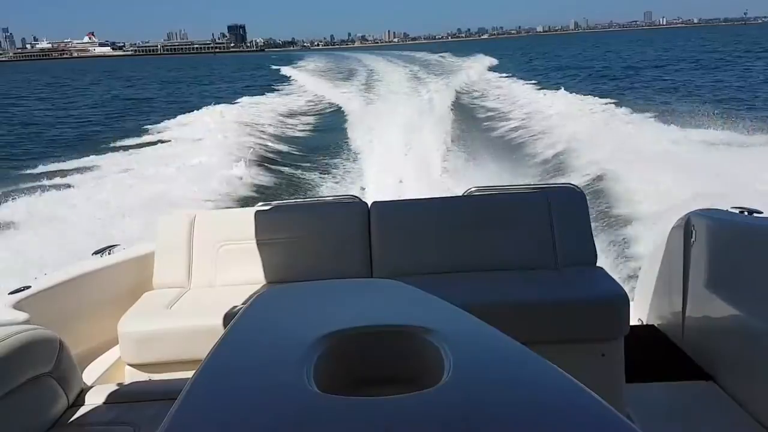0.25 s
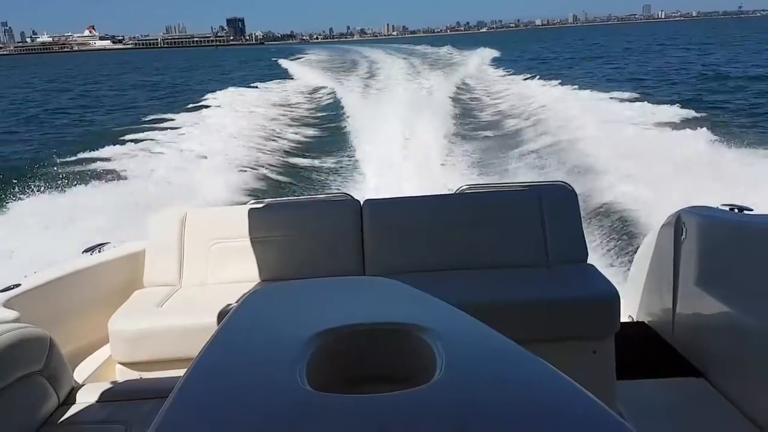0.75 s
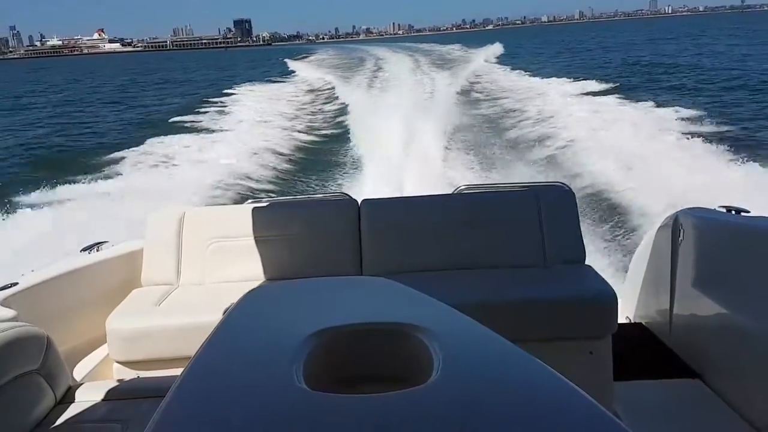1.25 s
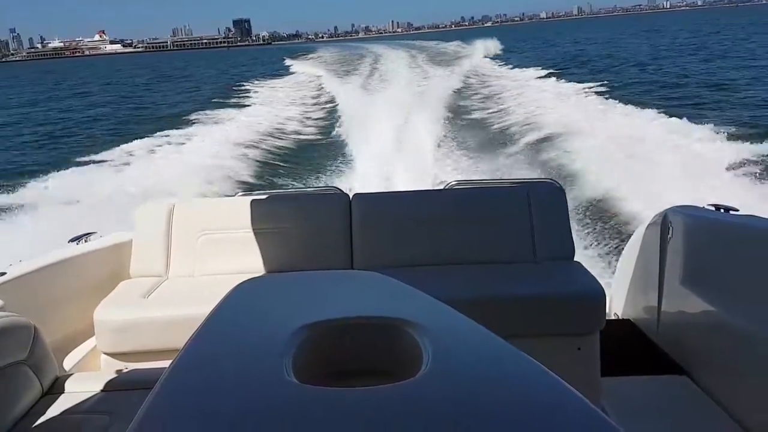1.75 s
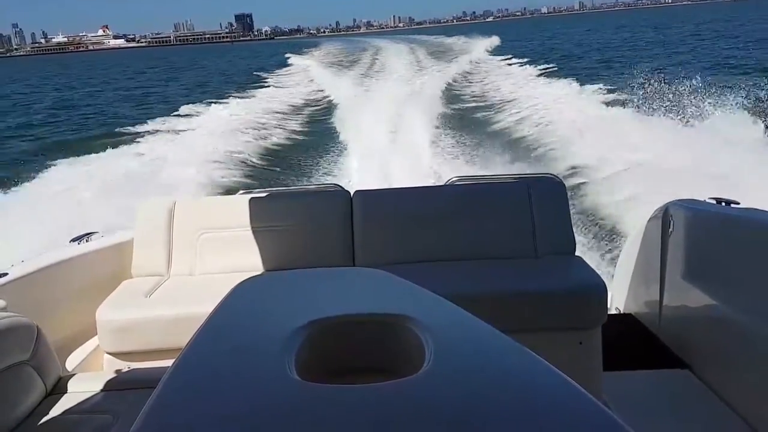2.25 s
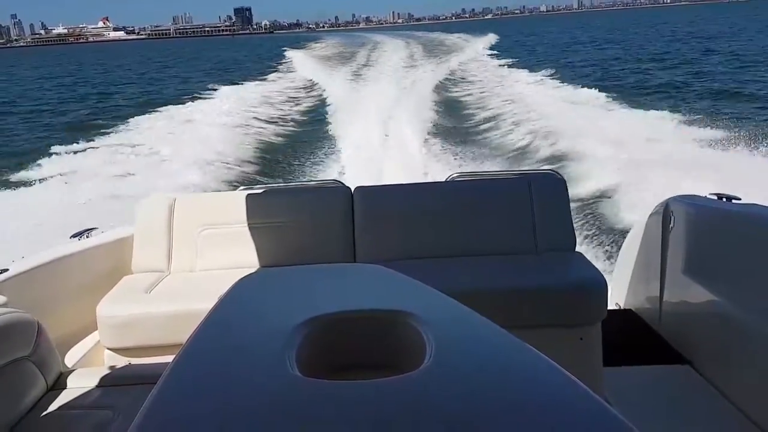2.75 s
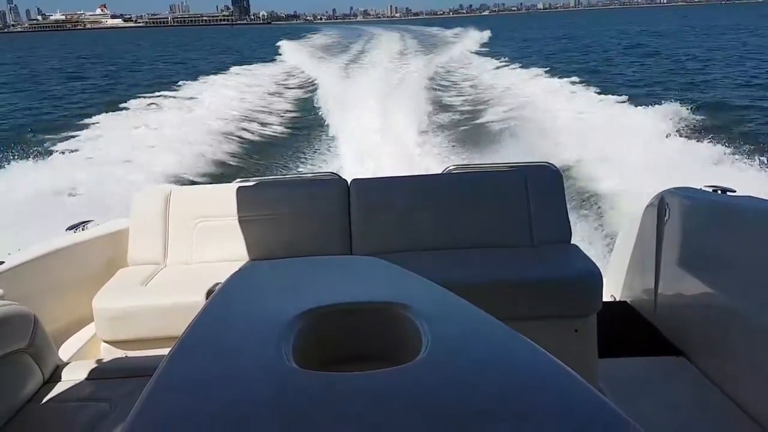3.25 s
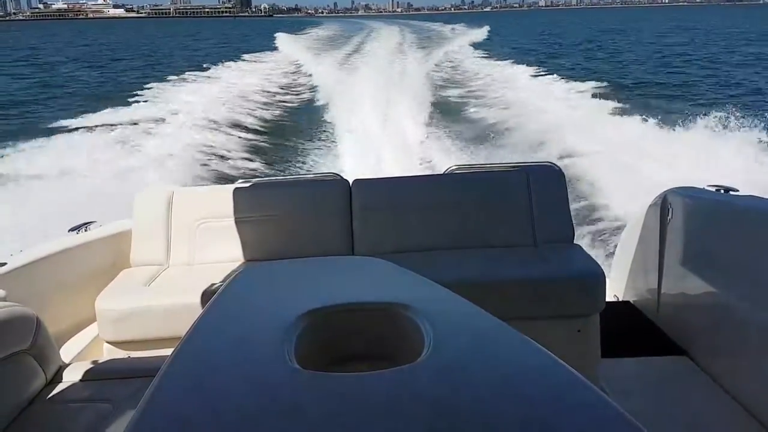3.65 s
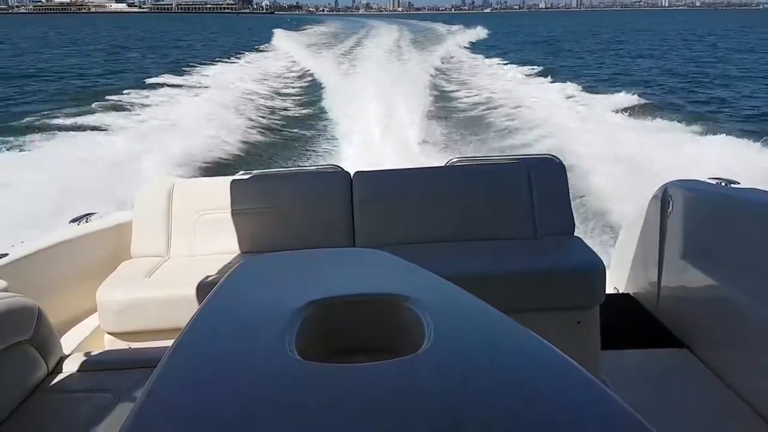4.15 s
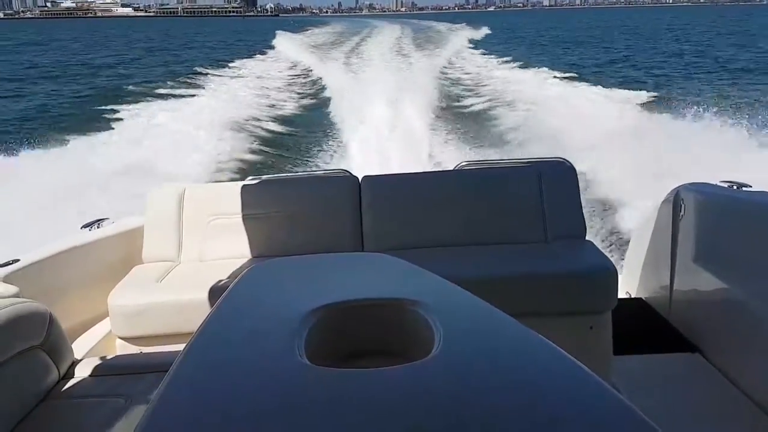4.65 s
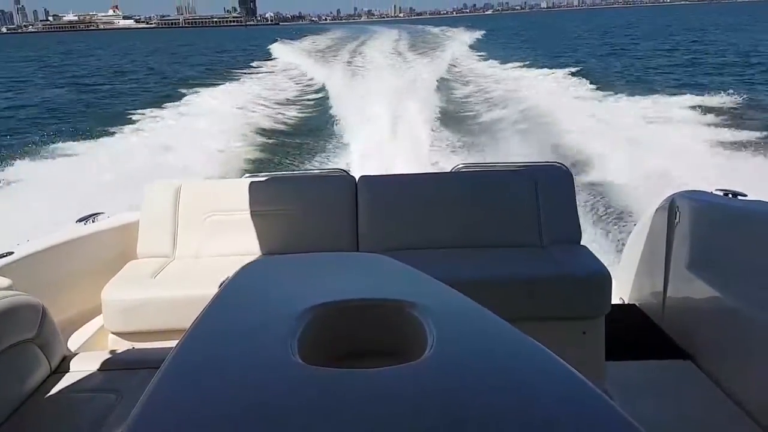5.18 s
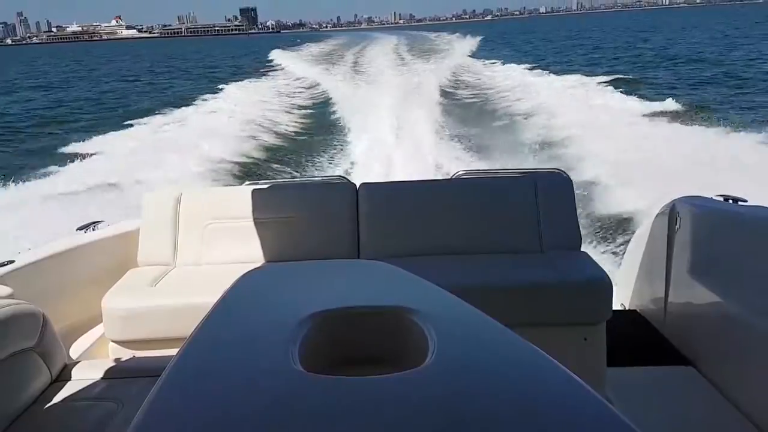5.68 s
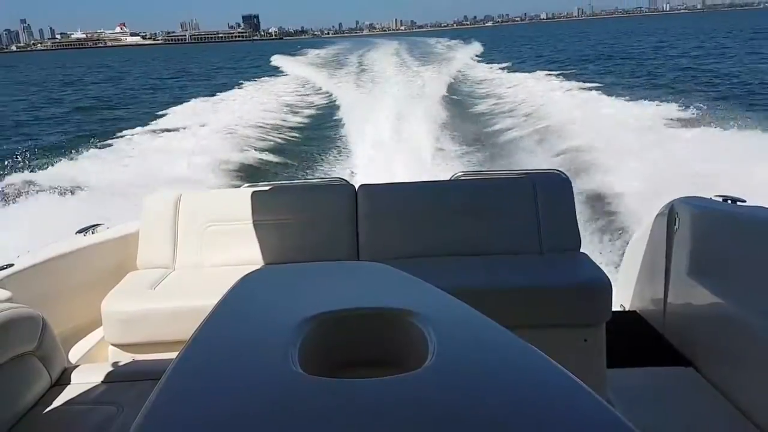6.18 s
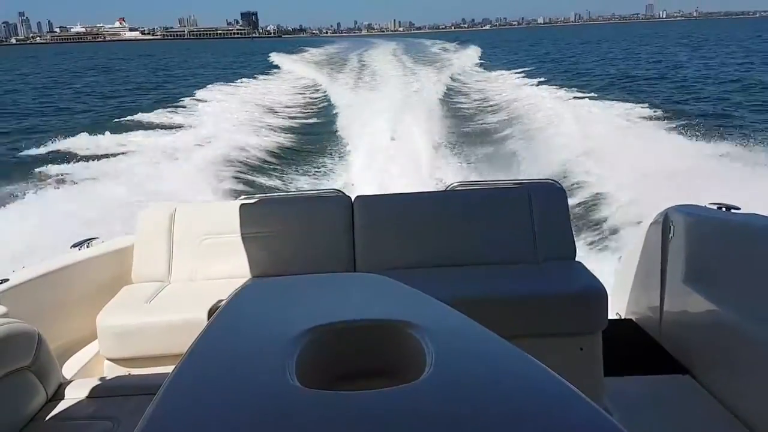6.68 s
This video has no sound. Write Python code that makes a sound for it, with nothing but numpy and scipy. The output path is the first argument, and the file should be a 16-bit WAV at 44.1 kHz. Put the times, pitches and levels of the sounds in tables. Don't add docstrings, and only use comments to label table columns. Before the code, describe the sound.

From 0 to about 7 seconds, a planing twin-engined motorboat runs steadily over open water, heard from its cockpit through two spaced microphones. The loudest sound is a piercing gear whine near 1 kHz: two almost identical tones drift by a few hertz and beat, slowly at first, then mostly three to seven times a second, leaning slightly right. Below are a rough engine and propeller drone, faint valve clatter and hull rumble; around them, dense exhaust roar and softer, wide hissing spray. Overall loudness pumps gently against the beats. Around 2.7 and 3.4 seconds one whine dips slightly; near 4.7 the other sags clearly, smoothing the beating for a moment as faint overtones rise. The wash swells a little around 6, then again at 6.6 and at the very end, with small whine dips. It begins and ends at full speed, dry and outdoors.

```python
import sys
import numpy as np
from scipy import signal
from scipy.fft import rfft, irfft, next_fast_len
from scipy.io import wavfile
from scipy.ndimage import uniform_filter1d

SR = 44100
rng = np.random.default_rng(int(sys.argv[2]) if len(sys.argv) > 2 else 0)


def linear_from_db(decibels):
    return 10 ** (np.asarray(decibels, float) / 20)


def master_out(mix):
    frames = np.transpose(np.atleast_2d(mix))
    ceiling = np.clip(frames, -1, 1)
    pcm = np.round(ceiling * 32767).astype(np.int16)
    wavfile.write(sys.argv[1], SR, pcm)


N = 305172
TEETH_PER_CYCLE = 32
LEAN = np.array([[0.5], [-0.5]])


def in_time(rows):
    s, *columns = np.transpose(rows)
    return np.array([np.interp(np.arange(N) / SR, s, c) for c in columns])


def drift(rate_hz):
    pole = np.exp(-80 * np.pi * rate_hz / SR)
    noise = rng.standard_normal(N // 40 + 2002)
    slow = signal.lfilter([1], [1, -2 * pole, pole * pole], noise)[2000:]
    return np.interp(np.arange(N) / 40, np.arange(len(slow)), slow / slow.std())


def unloading():
    # (engine [0 = A, 1 = B], time [s], half length [s], level [dB])
    stern_lifts = [
        (1, 2.72, .12, -2),
        (1, 3.36, .1, -1.5),
        (1, 4.4, .08, -1),
        (0, 4.66, 0.17, -5),
        (1, 6.6, 0.1, -2.5),
        (0, 6.85, .12, -1.5),
    ]
    sag_db, t = np.zeros((2, N)), np.arange(N) / SR
    for engine, s, half_s, db in stern_lifts:
        sag_db[round(engine)] += db * np.exp(-((t - s) / half_s) ** 2)
    return sag_db


def shaft(teeth, orders, per_turn, trim_db, wobble_db, wander, ahead=0):
    out = np.zeros((2, N))
    for multiple, *levels in orders:
        multiple = round(multiple)
        start = rng.random()
        for e in (0, 1):
            turns = multiple * (teeth[e] / per_turn + e * ahead) + start + wander * drift(6.7)
            level_db = levels[e] + trim_db + wobble_db[e] + wander * 60 * drift(4.2)
            gain = np.sqrt(2) * linear_from_db(level_db)
            out += gain * linear_from_db(LEAN * levels[2 + e]) * np.sin(2 * np.pi * turns)
    return out


def clatter(teeth, line_db=-55.0, slope_db=-8.0, spread_db=5.0):
    size, orders = 4096, np.arange(38, 125)
    out = np.zeros((2, N))
    for e in (0, 1):
        for side in (0, 1):
            comb = np.zeros(size // 2 + 1, complex)
            fall_db = slope_db * np.log2(orders / 48)
            level_db = line_db + fall_db + spread_db * rng.standard_normal(len(orders))
            comb[orders] = linear_from_db(level_db) * np.exp(2j * np.pi * rng.random(len(orders)))
            cycle = irfft(comb, size) * size / np.sqrt(2)
            where = teeth[e, side] / TEETH_PER_CYCLE % 1 * size
            out[side] += np.interp(where, np.arange(size), cycle, period=size) * linear_from_db(2.0 * drift(1.2))
    return out


def drives():
    # (time [s], tooth rate [Hz])
    speed_a = [(0.0, 1005.66), (0.36, 1007.85), (0.83, 1009.39), (1.08, 1007.97), (1.95, 1008.89),
               (2.16, 1007.47), (2.23, 1010.07), (2.84, 1008.97), (3.14, 1006.74), (3.32, 1010.05),
               (4.04, 1004.65), (4.44, 1006.8), (5.03, 1006.81), (5.22, 1009.18), (5.81, 1008.78),
               (6.17, 1009.0), (6.65, 1011.52), (6.92, 1007.45)]
    speed_b = [(0.0, 1005.2), (0.31, 1005.26), (0.44, 1003.99), (1.17, 1003.75), (1.75, 1003.09),
               (1.85, 1001.28), (2.37, 1004.54), (3.11, 1003.21), (3.34, 1003.65), (3.48, 1006.45),
               (3.97, 1001.82), (4.45, 1002.63), (4.62, 1006.92), (4.98, 1003.45), (5.85, 1006.11),
               (6.18, 1005.01), (6.72, 1008.25), (6.92, 1004.26)]
    # (multiple, A level [dB rms], B level [dB rms], A left-right [dB], B left-right [dB])
    mesh = [(1, -13.5, -13.5, -2.5, -1.5)]
    overtones = [(2, -42.5, -38.5, -3, 2), (3, -43, -44.5, 6, -6), (4, -53.5, -48, -3, -7)]
    crank = [(2, -46, -46, 2, 2), (3, -42, -42, 3, 3), (8, -42, -42, 1, 2), (11, -44, -42, 0, -1),
             (13, -50, -45, 4, -3), (14, -47, -47, 5, -10), (15, -38, -41, -6, -4), (16, -33.5, -43, -6, 3),
             (17, -44, -46, -1, 0), (18, -47, -46, 1, -5), (19, -35, -44, -1, 2), (20, -42, -46, 4, 4),
             (22, -42, -48, -1, 3), (23, -41, -43, -7, 12), (24, -48, -44, 2, -2), (26, -48, -41, -3, 0),
             (28, -50, -36, 4, 2), (30, -38, -37.5, -12, 1), (36, -61, -46, -2, 8), (40, -44, -41, -9, 2),
             (41, -46, -53, -4, 11), (48, -50, -44, 10, 2), (50, -48, -43, -3, 3), (72, -54, -45, 3, -9)]
    propeller = [(1, -49, -61, 4, 3), (3, -36, -34, 3, 2), (4, -44, -36, 5, 1), (5, -50, -46, 1, -1),
                 (6, -48, -50, 3, 2), (7, -34, -46, 2, -1), (8, -43, -43, 0, -2), (10, -44, -41, 0, 0),
                 (11, -55, -50, -4, 0), (23, -54, -46, 0, 2), (24, -51, -44, -10, -11)]
    idler = [(15, -47, -47, 1, 2), (16, -43, -32, -1, -3), (17, -30, -29, -1, 2), (18, -46, -42, -2, -2),
             (20, -44, -39, -2, -4), (34, -45, -46, -6, -1)]
    # (A slope [dB/Hz], B slope [dB/Hz])
    flank = [0.3, -0.3]
    # (engine A [s], engine B [s])
    left_lag = [.000116, .00038]
    hatch_lag_s = 0.0002
    b_behind_teeth = 0.08

    rate_hz = np.vstack([in_time(speed_a), in_time(speed_b)])
    swing_hz = rate_hz - rate_hz.mean(axis=1, keepdims=True)
    whine_db = np.array(flank)[:, None] * swing_hz + unloading()
    overtone_db = -1.6 * whine_db
    count = np.cumsum(rate_hz, axis=1) / SR - np.array([[0], [b_behind_teeth]])
    teeth = np.stack([count - np.array(left_lag)[:, None] * rate_hz, count], axis=1)
    hatch = np.stack([count - hatch_lag_s * rate_hz, count], axis=1)
    per_propeller = 19 * 26 / 17

    tones = shaft(teeth, mesh, per_turn=1, trim_db=-1, wobble_db=whine_db, wander=0.0049)
    tones += shaft(hatch, overtones, per_turn=1, trim_db=0, wobble_db=overtone_db, wander=0.022)
    tones += shaft(hatch, crank, TEETH_PER_CYCLE, trim_db=-2.0, wobble_db=[0, 0], wander=0.029)
    tones += shaft(hatch, propeller, per_propeller, trim_db=-1.0, wobble_db=[0, 0], wander=0.014,
                   ahead=0.727)
    tones += shaft(hatch, idler, per_turn=19, trim_db=-2.6, wobble_db=[0, 0], wander=0.019, ahead=-0.012)
    return tones + clatter(hatch), count


def at_hz(points, hz):
    at, *columns = np.transpose(points)
    return np.array([np.interp(np.log(hz), np.log(at), c) for c in columns])


def rush(spectrum_db, hz, size, curve_db, patchy_db, grain_db, throb):
    # (frequency [Hz], shared power [0-1])
    likeness = [(40, 0.83), (300, 0.97), (600, 1), (1200, 0.74), (2500, 0.03), (5000, 0.17), (9000, 0.02)]
    wash_lag_s = 0.00025
    grains = linear_from_db(grain_db * np.minimum(rng.exponential(1, (2, size)), 5))
    white = rng.standard_normal((2, size)) * grains
    common, own = rfft(white / white.std())
    own = np.array([own, rfft(rng.standard_normal(size))])
    alike = np.clip(at_hz(likeness, hz), 0, 1)
    late = np.exp(-2j * np.pi * hz * wash_lag_s * np.array([[1], [0]]))
    both = np.sqrt(alike) * common * late + np.sqrt(1 - alike) * own
    both = both * linear_from_db(spectrum_db) * np.sqrt(SR / 2)
    band = 2 * np.log2(hz / 20)
    out, together, near = np.zeros((2, N)), drift(2.2), drift(6.0)
    for k in range(21):
        window = np.cos(np.pi / 2 * np.clip(band - k, -1, 1)) ** 2
        if np.max(window * linear_from_db(spectrum_db)) > 1e-7:
            after = drift(2.5)
            flicker = together + 0.45 * (near + after) + 0.67 * drift(13.0)
            out += linear_from_db(patchy_db * flicker) * irfft(both * window, size)[:, :N]
            near = after
    return out * linear_from_db(curve_db) * throb


def wash(teeth):
    # (time [s], level [dB])
    effort = [(0.0, -1), (0.7, 0.6), (1.4, 0.2), (2.1, 1.3), (3.15, -1.1), (3.5, 0), (4.2, 0.6),
              (4.9, -0.3), (5.3, 0), (5.6, 0.8), (6.0, 1.5), (6.35, 0.5), (6.6, 3), (6.78, 1), (6.92, 5)]
    # (frequency [Hz], density [dB/Hz])
    hull_spectrum = [(22, -77), (35, -56.5), (60, -55), (100, -50), (160, -49.5), (250, -50), (330, -55),
                     (450, -58.5), (600, -57), (780, -59), (870, -51), (970, -51.5), (1100, -56.5),
                     (1300, -68)]
    # (frequency [Hz], left-right [dB])
    leaning = [(40, 3), (100, 3), (200, -0.5), (400, 0.3), (700, -2), (1200, 6.5)]
    # (frequency [Hz], left density [dB/Hz], right density [dB/Hz])
    roar_spectrum = [(1300, -58.5, -61), (1460, -57.5, -57.5), (1910, -57, -57), (2090, -62, -61),
                     (2360, -63, -65.5), (2940, -69.5, -63), (3190, -74.5, -70), (3520, -78.5, -71),
                     (4040, -71, -68.5), (4140, -73.7, -84.5)]
    spray_spectrum = [(4170, -74, -72), (4970, -77.5, -73), (5230, -80.5, -77.5), (5900, -81, -75.5),
                      (6500, -86, -79.5), (7160, -85, -78), (7970, -78.5, -76), (8500, -81, -81),
                      (9100, -83.5, -84.5), (9800, -79.5, -88), (11200, -79.5, -87), (11800, -84, -85.7),
                      (12800, -79, -84.5), (14200, -83.5, -82.5)]
    # (frequency [Hz], half width [Hz], level above the spray [dB])
    intake_hiss = [(14650, 130, 1), (15030, 150, 4.5)]

    size = next_fast_len(N)
    hz = np.maximum(np.arange(size // 2 + 1) * SR / size, 1)
    roar_db, = in_time(effort)
    hull_db, spray_db = 0.85 * roar_db, 0.58 * roar_db

    def above(edge_hz):
        return np.clip(np.log2(hz / edge_hz) * 4 + 0.5, 1e-12, 1 - 1e-12)

    low, high = above(1300), above(4200)
    hiss_db = sum(db / (1 + ((hz - f) / w) ** 4) for f, w, db in intake_hiss)
    turn = 1 + 0.012 * np.cos(4 * np.pi * teeth / TEETH_PER_CYCLE).sum(axis=0)
    hull = at_hz(hull_spectrum, hz) + LEAN * at_hz(leaning, hz) + 0.5
    hull = hull + 10 * np.log10(1 - low) + 15 * np.log10(np.minimum(hz / 22, 1))
    roar = at_hz(roar_spectrum, hz) + 0.57 + 10 * np.log10(low * (1 - high))
    spray = at_hz(spray_spectrum, hz) + 0.69 + hiss_db + 10 * np.log10(high)
    return (rush(hull, hz, size, hull_db, patchy_db=0.76, grain_db=0.5, throb=turn)
            + rush(roar, hz, size, roar_db, patchy_db=0.95, grain_db=0.2, throb=turn)
            + rush(spray, hz, size, spray_db, patchy_db=0.6, grain_db=2.0, throb=0.8))


def scene():
    tones, teeth = drives()
    return tones + wash(teeth)


def band_limit(x):
    return signal.sosfilt(signal.butter(12, 15740, fs=SR, output="sos"), x)


def record(dry):
    ceiling_db, release_db_s, ratio, attack_s = -2.8, 16.0, 0.8, 0.005
    makeup_db = 1.03
    t = np.arange(N) / SR
    peak_db = 20 * np.log10(np.abs(dry).max(axis=0) + 1e-6)
    held_db = np.maximum.accumulate(peak_db + release_db_s * t) - release_db_s * t
    cut_db = ratio * np.maximum(held_db - ceiling_db, 0)
    span = int(attack_s * SR)
    ahead_db = np.append(cut_db[span // 2:], cut_db[-(span // 2):])
    cut_db = uniform_filter1d(ahead_db, span)
    return band_limit(dry * linear_from_db(makeup_db - cut_db))


dry = scene()
out = record(dry)
master_out(out)
```